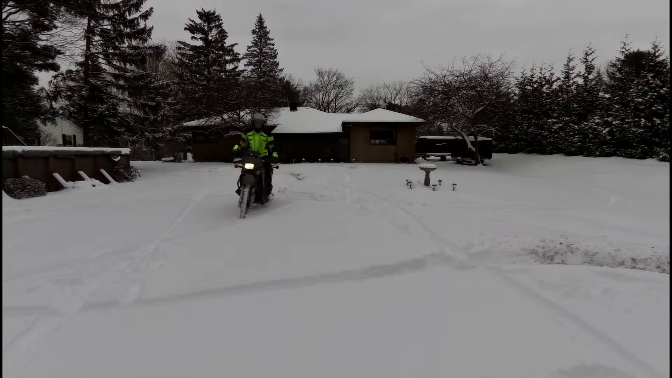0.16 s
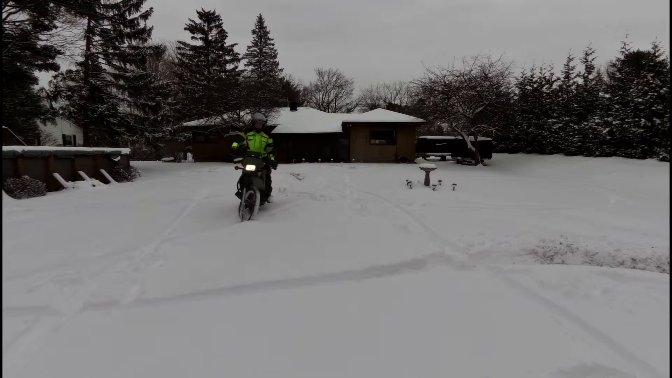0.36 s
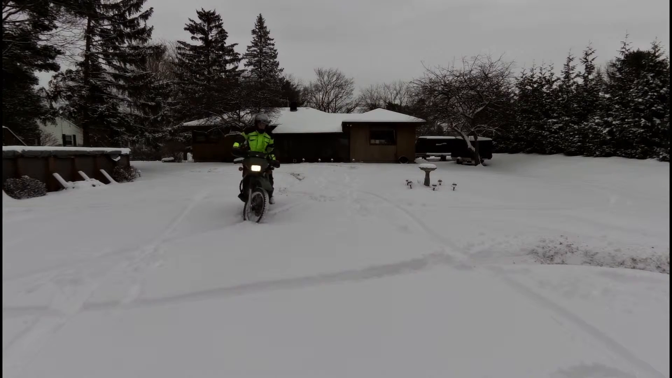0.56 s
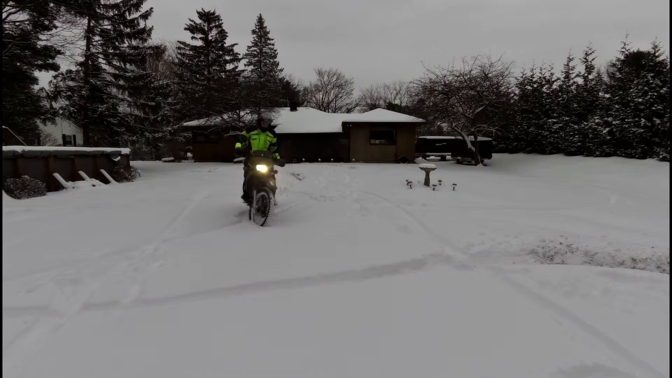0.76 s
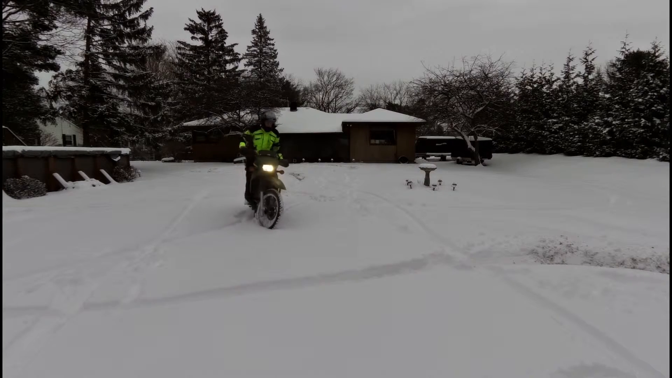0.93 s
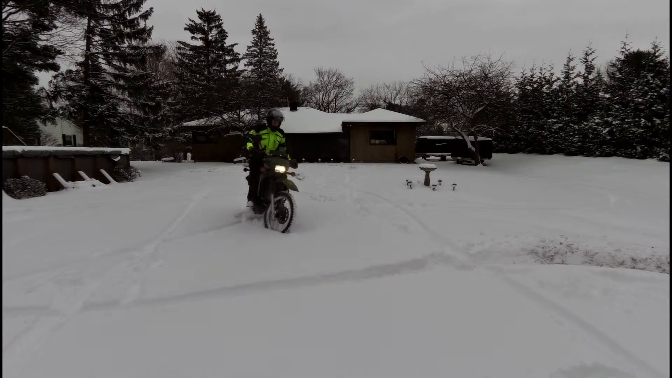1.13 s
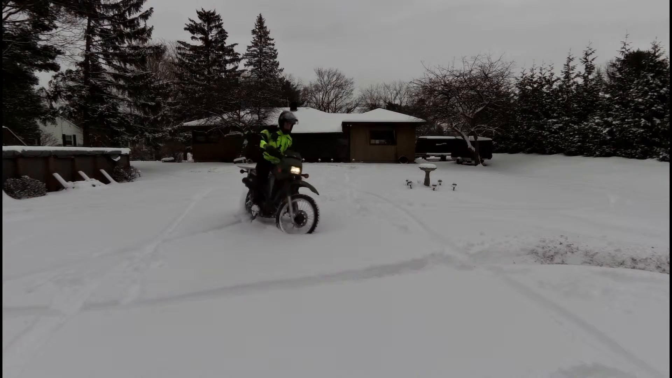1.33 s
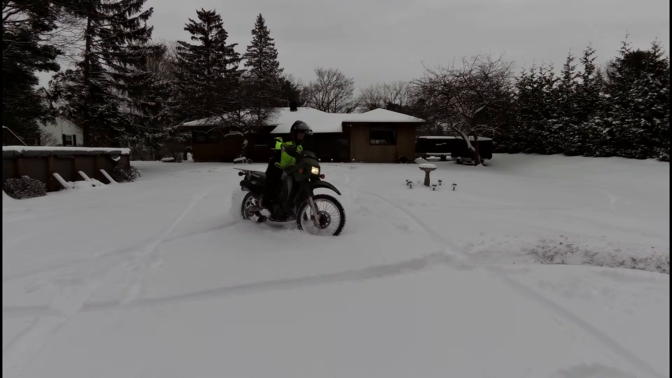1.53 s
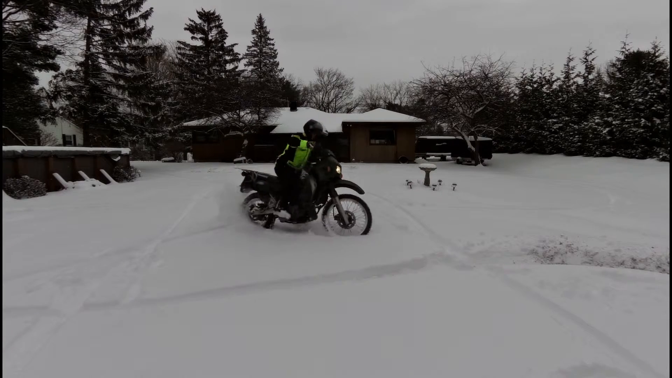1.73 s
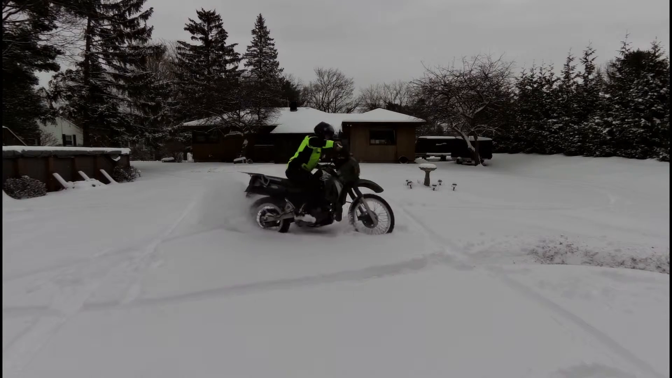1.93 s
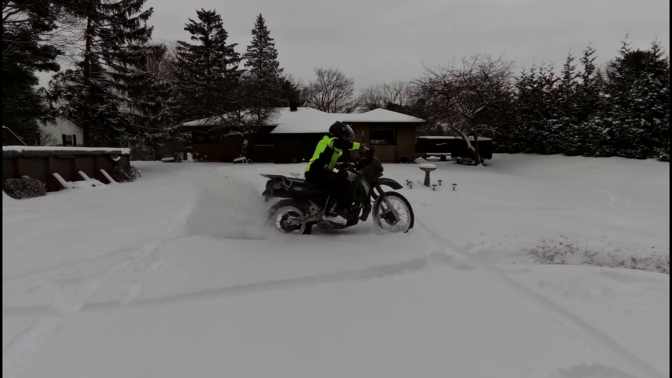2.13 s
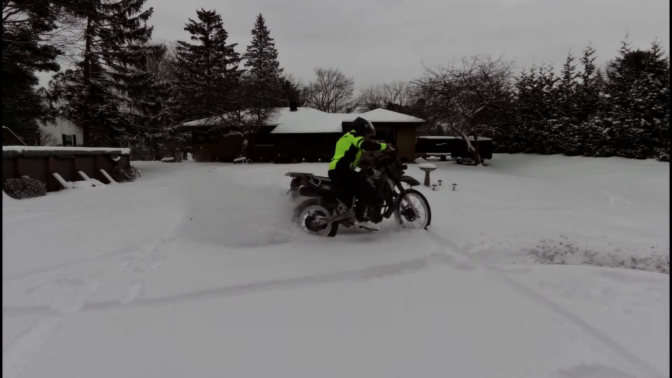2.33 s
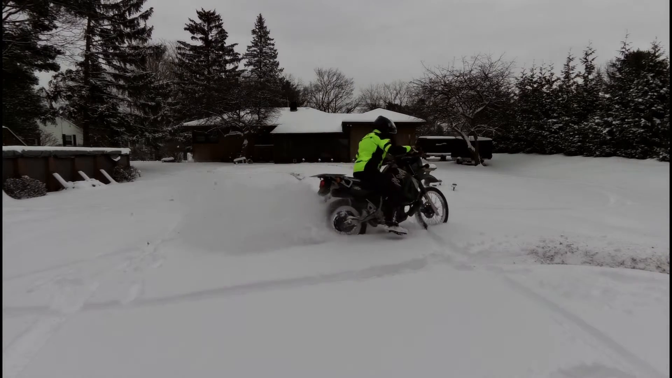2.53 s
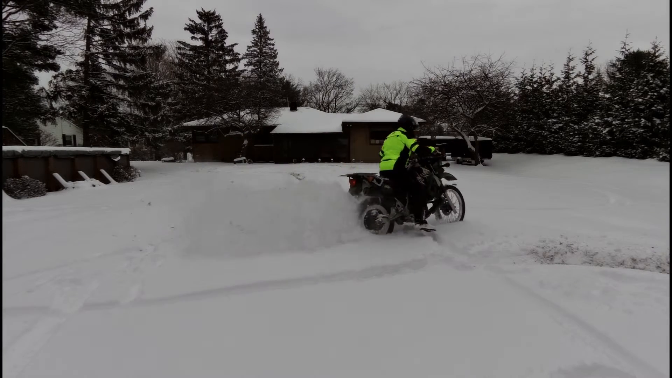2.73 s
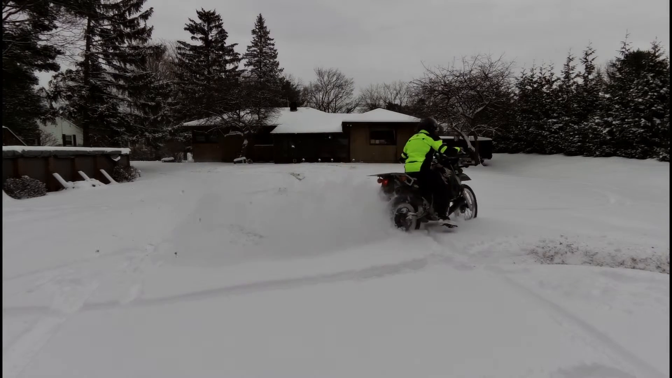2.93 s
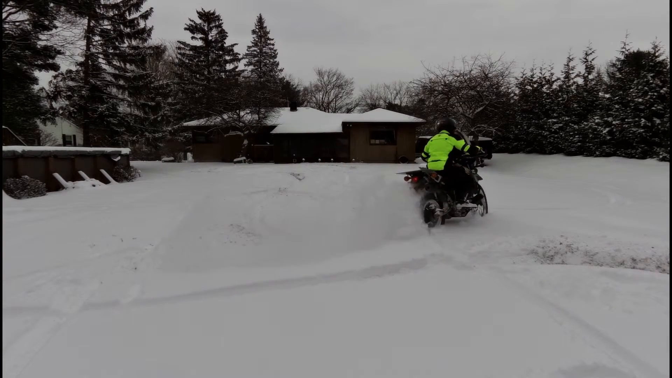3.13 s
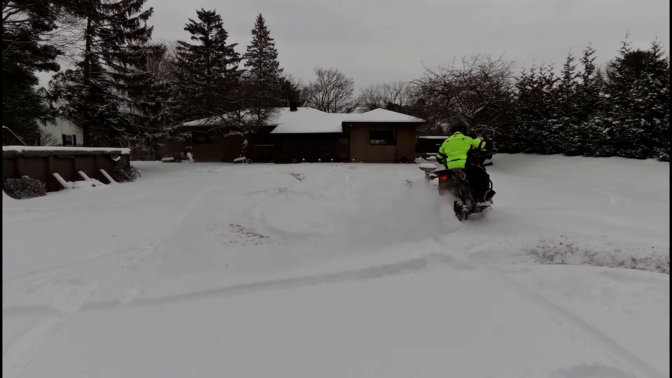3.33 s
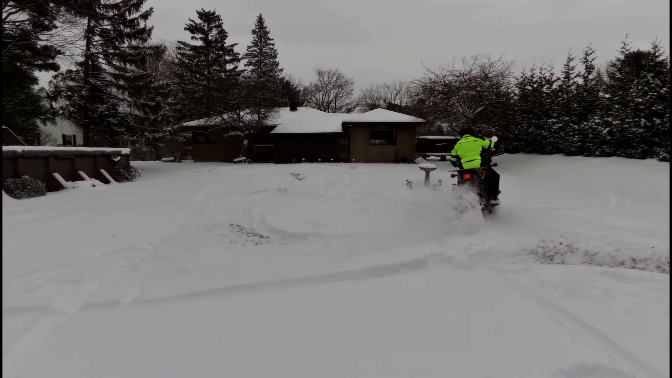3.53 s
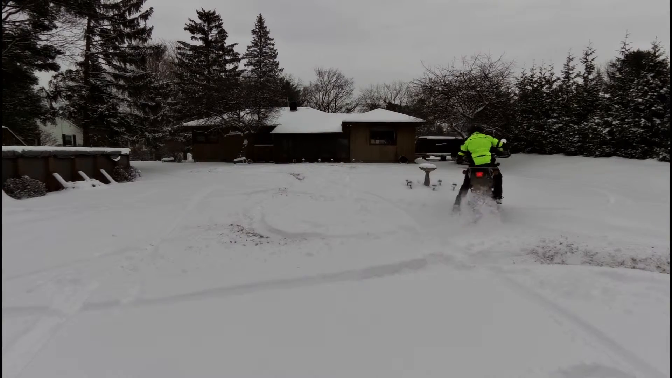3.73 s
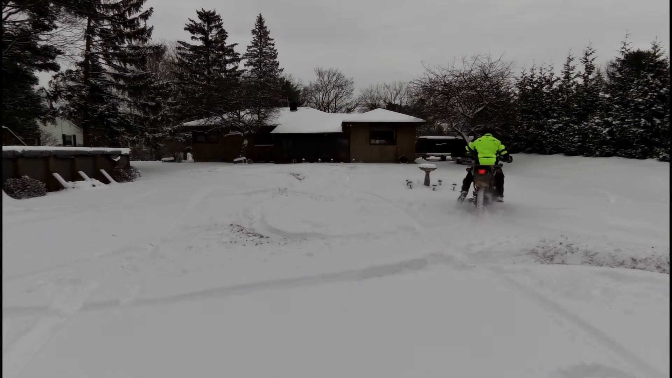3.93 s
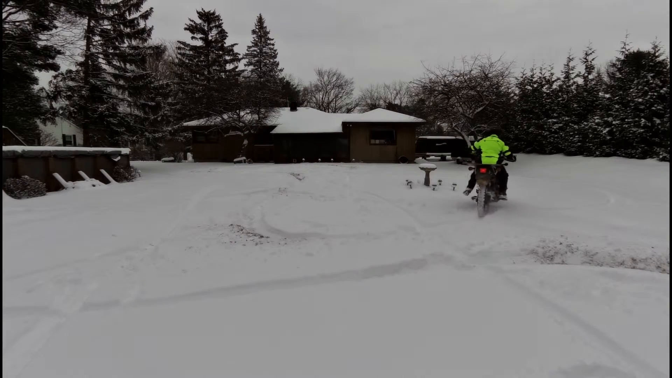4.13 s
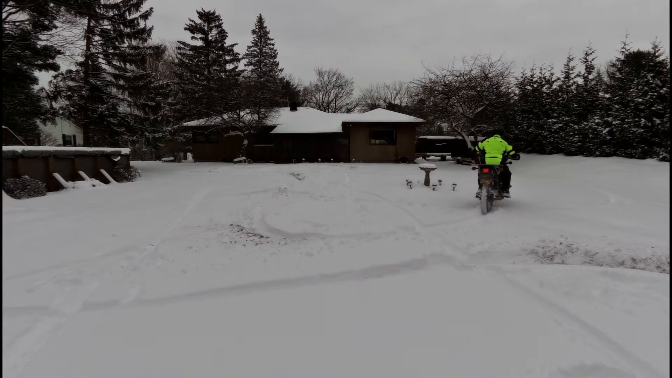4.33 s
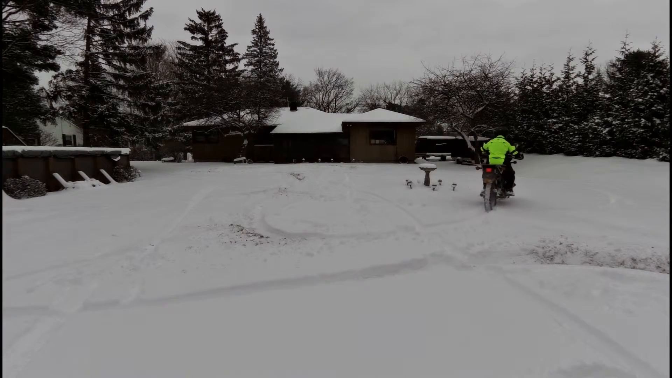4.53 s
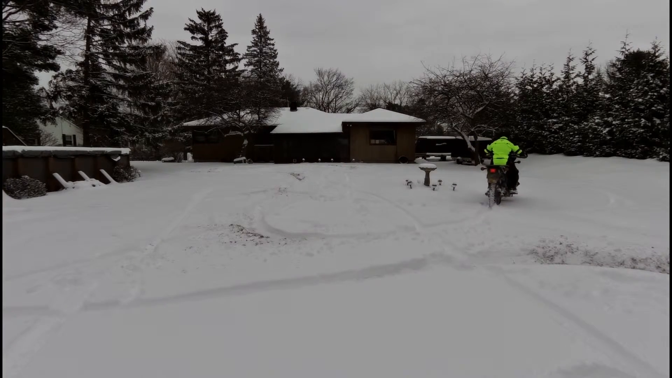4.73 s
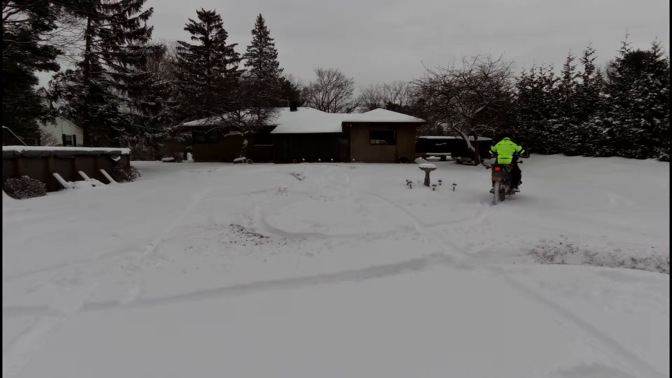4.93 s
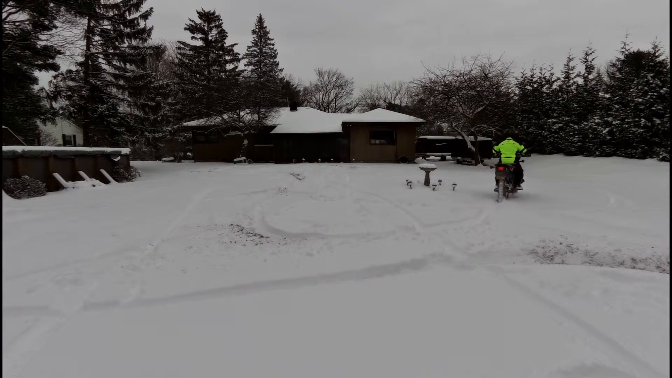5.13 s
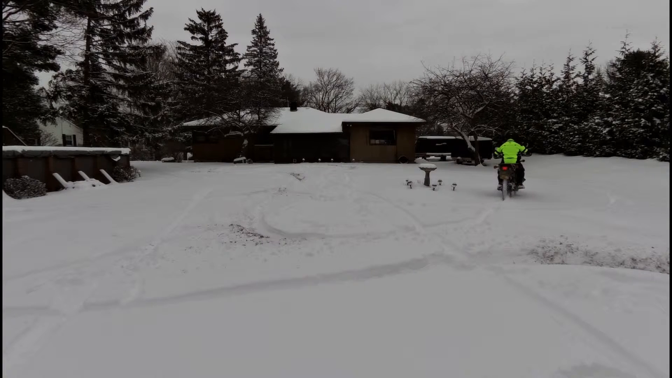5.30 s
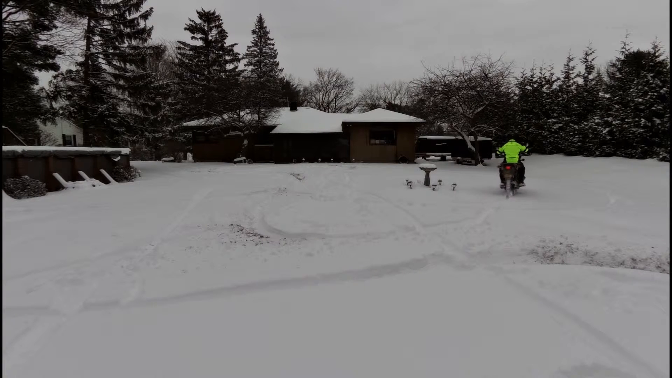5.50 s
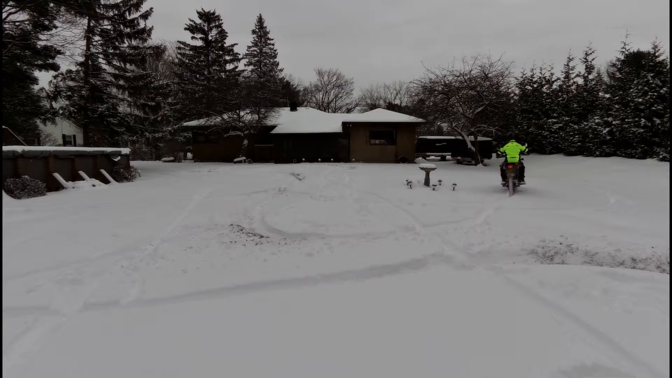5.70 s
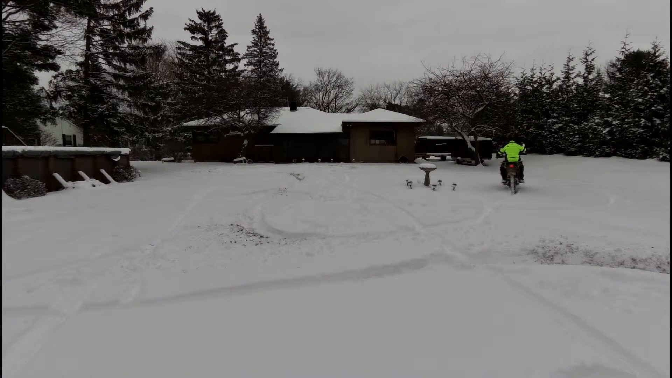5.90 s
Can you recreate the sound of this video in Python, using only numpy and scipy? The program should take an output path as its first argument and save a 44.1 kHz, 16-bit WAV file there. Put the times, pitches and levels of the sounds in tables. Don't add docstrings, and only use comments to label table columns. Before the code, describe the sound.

Outdoors in a snowy yard, a single-cylinder four-stroke motorcycle approaches at a quiet, clattering idle. A throttle blip brings a hollow intake howl, then the engine builds into a fast, coarse, booming roar as it turns close by. The throttle snaps shut with a low thud, revs surge again from behind, then sink to a soft, slow putter. Dry, echo-free, heard by a small fixed microphone over faint air.

```python
import sys
import numpy as np
from scipy import signal
from scipy.fft import rfft, irfft, next_fast_len
from scipy.io import wavfile
from scipy.ndimage import uniform_filter1d

SR = 44100
rng = np.random.default_rng(int(sys.argv[2]) if len(sys.argv) > 2 else 0)


def unload_wav(signal):
    wavfile.write(
        sys.argv[1],
        SR,
        np.round(np.clip(np.atleast_2d(signal).T, -1, 1) * 32767).astype(np.int16),
    )


def magnitude_from_level(level_db):
    exponent = np.asarray(level_db, float) / 20
    return 10 ** exponent


N = 267246


def unit(x):
    return x / np.sqrt(np.mean(x ** 2) + 1e-20)


def near(x, centre, width):
    return np.exp(-((x - centre) / width) ** 2)


def swell(t, tau):
    return t / tau * np.exp(1 - t / tau)


def filtered(x, response):
    m = next_fast_len(N + SR // 2)
    return irfft(rfft(x, m) * response(np.fft.rfftfreq(m, 1 / SR)), m)[:N]


def below(x, hz):
    return filtered(x, lambda f: 1 / (1 + (f / hz) ** 6))


def lifted(x, gain_db, hz, width_hz):
    return x + (magnitude_from_level(gain_db) - 1) * filtered(x, lambda f: near(f, hz, width_hz))


def coloured(x, spectrum, share=lambda f: 1):
    hz, db = np.transpose(spectrum)
    x = unit(filtered(x, lambda f: magnitude_from_level(np.interp(np.log(f + 1), np.log(hz), db))))
    return filtered(x, lambda f: np.sqrt(share(f)))


def noise(spectrum, gate=1, share=lambda f: 1):
    return coloured(gate * rng.standard_normal(N), spectrum, share)


def flutter(db):
    return magnitude_from_level(db * unit(uniform_filter1d(rng.standard_normal(N), size=90)))


def laid(times, shapes):
    index = np.round(times * SR).astype(int)[:, None] + np.arange(shapes.shape[1])
    keep = (index >= 0) & (index < N)
    return np.bincount(index[keep], shapes[keep], N)


def levelled(x, db):
    power = x ** 2
    for _ in range(2):
        power = uniform_filter1d(power, size=SR // 6, mode="reflect")
    return x * magnitude_from_level(db) / np.sqrt(np.abs(power) + 1e-12)


def curves(rows, s):
    at, *cols = np.transpose(rows)
    return [np.interp(s, at, c) for c in cols]


# (time [s], firing rate [firings per s])
CRANK_SPEED = [(0.0, 10.88), (0.469, 10.31), (0.782, 18.09), (0.891, 18.36), (1.159, 15.04), (1.347, 15.34),
               (1.548, 20.31), (2.015, 26.73), (2.443, 26.21), (2.524, 27.1), (3.016, 28.19),
               (3.235, 27.74), (3.447, 19.23), (4.02, 29.24), (4.246, 31.12), (5.019, 15.05),
               (5.614, 10.68), (6.06, 9.97)]


def speed(s):
    flywheel_s = .14
    rate = curves(CRANK_SPEED, np.arange(N) / SR)[0]
    smooth = uniform_filter1d(rate, size=round(flywheel_s * SR), mode="nearest")
    return np.interp(s, np.arange(N) / SR, smooth)


def firings():
    first_cycles = .47
    s = np.arange(N) / SR
    cycles = np.cumsum(speed(s)) / SR - first_cycles
    fire = np.interp(np.arange(int(cycles[-1]) + 1), cycles, s)
    return np.append(fire, 2 * fire[-1] - fire[-2])


# (time [s], heading [degrees])
BIKE_HEADING = [(0, -20), (.4, -20), (.6, 0), (1.35, 10), (1.5, 40), (1.86, 70), (1.88, 75), (2.3, 93),
                (2.55, 102), (2.72, 119), (3.27, 125), (3.35, 170), (3.6, 178), (4.7, 185), (5, 195),
                (6.06, 200)]


def facing(rows, s):
    return curves(rows, curves(BIKE_HEADING, s)[0])


SHARED_HEADINGS = [-20, 5, 40, 75, 95, 120, 170, 180, 198]


def by_bearing(rows, s):
    return facing(np.column_stack([SHARED_HEADINGS, rows]), s)


# (time [s], level [dB])
MOTOR_LOUDNESS = [(0, -48), (.32, -48.5), (.6, -43.5), (.88, -41.5), (1.2, -41.5), (1.42, -39.5),
                  (1.62, -36.5), (1.87, -34), (2.01, -31), (2.15, -32.5), (2.45, -30), (3.21, -30.5),
                  (3.37, -38.5), (3.8, -36), (4.29, -36), (4.7, -39.5), (5.16, -45.5), (6.06, -48)]


def loudness(s):
    return curves(MOTOR_LOUDNESS, s)[0]


# (frequency [Hz], level [dB per Hz])
AIR_COLOUR = [(18, -23.5), (40, -8.5), (150, -10.5), (400, -16), (1500, -36), (3500, -36.5), (5500, -43),
              (8000, -51), (12300, -62.5), (13000, -120)]


def winter_air():
    return magnitude_from_level(-60) * noise(AIR_COLOUR)


# (time [s], peak level [dB], level of what rings above the main tone [dB])
CAMERA_TICKS = [
    (0.0094, -35, -3.5),
    (1.31, -45.5, -6),
]
# (frequency [Hz], level [dB], ring time [ms])
CAMERA_BODY = [(3950, 0, .6), (5800, -6, .3), (3200, -7, .4), (4600, -2, .4)]


def camera():
    s, db, top_db = np.transpose(CAMERA_TICKS)
    t = np.arange(SR // 100) / SR
    main_hz = CAMERA_BODY[0][0]
    tick = 0
    for hz, level, ring_ms in CAMERA_BODY:
        size = magnitude_from_level(level + top_db[:, None] * (hz > main_hz))
        tick = tick + size * np.sin(2 * np.pi * hz * t) * swell(t, ring_ms / 1000)
    return laid(s + 0.000069, magnitude_from_level(db - 2.5)[:, None] * tick)


# (clatter level [dB], roar under 330 Hz [dB],
# share gated by the firing [0-1], side cover's band [dB])
MOTOR_SIDES = [(-20, 5, 0.2, -0.5), (-18.5, 2.5, 0.42, -0.5), (-15.5, 2, 0.59, -2.5), (-17, 3, 0.32, 2.5),
               (-18.5, 3.5, 0.28, 5), (-16.5, -6.5, 0.35, 0), (-15, 7, 0.38, 3), (-18, -3.5, 0.08, 0.5),
               (-16.5, 0.7, 0.36, -0.5)]
# (heading [degrees], gust lead [ms],
# first valve lead [ms], second valve lead [ms], rocker knock between the valves [0-1])
NOISE_LEAD = [(-20, 30, 29, 0, 0), (3, 24, 20.5, -2, .2), (8, 28, 23.5, -3, .1), (10, 28, 23, 0, .1),
              (40, 23, 19, 5, .7), (70, 19, 16.5, 4, .8), (80, 16, 14, 2, .8), (97, 13, 12.5, -.5, .9),
              (105, 12, 10, .3, .3), (125, 12, 10, .8, .5), (170, 18, 12, 5, .6), (178, 17.5, 12, 5.5, .6),
              (181, 15, 12, 5.5, .5), (183, 14.5, 13, 5.5, .4), (185, 18.5, 14, 7, .3),
              (190, 18, 15, 5.5, .2), (200, 20, 17, 4.5, 0)]
# (heading [degrees], snap polarity [+1 or -1], second valve against
# the first [dB], loose tail parts [0-1], roar that repeats every firing [0-1])
FACING_PARTS = [(-20, 1, -12, 0, .15), (0, 1, -9, 0, .3), (20, 1, -10, 0, .2), (48, 1, -2, 0, .2),
                (72, 1, -4, 0, .35), (85, 1, 0, 0, .75), (110, 1, 1, 0, .7), (125, 1, 3, 0, .72),
                (142, 1, 7, 0, .55), (165, -1, 9, 0, .4), (179, -1, 8, 0, .45), (182, -1, 8, 0, .65),
                (185, -1, 5, .2, .35), (195, -1, -1, .7, .2), (200, -1, -2, .7, .15)]
# (frequency [Hz], level [dB per Hz])
WHIRR_COLOUR = [(880, -38.5), (1700, 0.5), (2060, -2), (2400, -4), (2890, -7), (3450, -15), (4200, -19.5),
                (4450, -26.5), (5200, -26.5), (6200, -37), (7600, -48.5), (8300, -46), (10000, -60.5),
                (12400, -68)]
# (frequency [Hz], level [dB per Hz])
HEAD_COLOUR = [(1200, -28.5), (1900, 2.5), (2300, -5.5), (2900, -2), (3400, -20), (3900, -13), (4300, -20),
               (4500, -37), (5300, -25), (6200, -38.5), (8300, -47), (12400, -64.5)]
# (heading [degrees], frequency [Hz], size [ratio])
VALVE_PING = [(-20, 1500, .6), (0, 2000, .7), (10, 2100, .8), (40, 2200, .5), (75, 2100, .35),
              (95, 2300, .25), (110, 2900, .4), (125, 2950, .5), (170, 3700, .3), (175, 2900, .4),
              (179, 2850, .3), (181, 3000, .15), (195, 3300, .2)]
METAL_COVER = [(-20, .1, 0), (10, .15, 0), (40, .5, 0), (75, .6, 0), (100, 1, 0), (125, 1, .1),
               (170, 1, .55), (178, 1, .3), (182, 1, 0)]


def clatter(fire):
    ping_db, ping_ms = 7.5, 1.6
    chain_hz, chain_db = 4080, 1.5
    s, t = np.arange(N) / SR, np.arange(SR // 50) / SR
    clatter_db, _, share, _ = by_bearing(MOTOR_SIDES, s)
    share = np.clip(share, 0, 1)
    first_ms, second_ms, rocker = facing(NOISE_LEAD, fire)[1:]
    _, second_db, loose, _ = facing(FACING_PARTS, fire)

    chance = rng.standard_normal((len(fire), 6))
    uneven = magnitude_from_level(1.4 * chance[:, :4])
    size = uneven * np.transpose([1 + 0 * loose, magnitude_from_level(second_db), 1.3 * loose, .9 * loose])
    lag = np.transpose([-first_ms, -second_ms, 3 + 0 * loose, 15 + 0 * loose]) / 1000
    lag = lag + .0008 * chance[:, [4, 5, 4, 5]]
    tick = np.exp(-.5 * ((t - .01) / .0022) ** 2)
    burst = laid((fire[:, None] + lag - .01).ravel(), size.reshape(-1, 1) * tick)
    between = fire + lag[:, 0] + (lag[:, 1] - lag[:, 0]) * rng.uniform(.2, .8, len(fire))
    burst = burst + laid(between - .01, (rocker * uneven[:, 2])[:, None] * tick)

    rattle = flutter(0.42)
    whirr = (1 - share) * noise(WHIRR_COLOUR, rattle * (1 + .5 * burst))

    ping_hz, ping = facing(VALVE_PING, fire)
    pitches = ping_hz[:, None] * (1 + 0.092 * chance[:, 3::-1])
    ring = np.sin(2 * np.pi * np.outer(pitches, t)) * swell(t, ping_ms / 1000)
    ping_size = magnitude_from_level(ping_db) * ping[:, None] * size
    pings = laid((fire[:, None] + lag - .001).ravel(), ping_size.reshape(-1, 1) * ring)

    chain = np.sin(2 * np.pi * chain_hz * np.outer(1 + 0.032 * chance[:, 2], t)) * swell(t, ping_ms / 1000)
    chain_size = facing(METAL_COVER, fire)[1] * uneven[:, 3]
    pings = pings + laid(fire + 0.018, magnitude_from_level(chain_db) * chain_size[:, None] * chain)

    seat, bright = noise(HEAD_COLOUR, rattle * burst), facing(METAL_COVER, s)[0]
    seat = bright * seat + (1 - bright) * below(seat, 2700)
    return levelled(pings + whirr + 1.84 * share * seat, loudness(s) + clatter_db + 0.5)


# (frequency [Hz], level [dB per Hz])
ROAR_COLOUR = [(120, -39), (190, -14), (250, -11.5), (310, -6), (390, -1), (493, -5), (646, -4), (800, -6),
               (1060, -7.5), (1150, -11.5), (1390, -12), (1900, -23), (2500, -38), (5500, -120)]
# (heading [degrees], rise time [ms], fall time [ms])
GAS_GUST = [(-21.5, 4, 4.9), (7, 2.2, 15), (33, 0.83, 14), (59.5, 1.1, 6.8), (80, 3, 7.8),
            (125.5, 3.8, 5.1), (182.5, 3, 7.7), (201, 2.5, 17)]
# (heading [degrees], lead [ms])
SNAP_LEAD = [(-20, 19), (3, 18.5), (8, 25.5), (10, 24), (30, 10.7), (40, 10.4), (67, 10.3), (78, 9.5),
             (81, 10.3), (95, 10), (105, 10.3), (121, 10.1), (125, 10.3), (148, 11.5), (170, 15.4),
             (177.7, 15.3), (178.8, 14.1), (180, 13.6), (180.7, 12.9), (181.1, 12.3), (181.6, 12.7),
             (182, 12.6), (182.6, 11.6), (183, 12.6), (183.5, 14.2), (184.3, 16), (185.5, 15.4),
             (190, 14.9), (200, 15.8)]
# (heading [degrees], honk frequency [Hz], second puff's delay [ms],
# push ahead of the boom [0-1])
PIPE_EXIT = [(-20, 364, 10.7, 0), (3, 380, 6, 0), (8, 380, 12.5, 0), (40, 400, 10.7, 0), (95, 380, 10.5, 0),
             (105, 364, 10.7, 0), (125, 364, 10.7, 0), (172, 368, 11, 0), (174, 368, 11, .3),
             (179, 374, 9.5, .3), (181, 374, 8.9, .3), (186, 370, 9, .6), (200, 364, 9.1, .45)]
# (heading [degrees], snap thrown back by the engine case [0-1], roar level [dB])
CASE_REFLECTION = [(40, 0, 0), (75, .45, -1), (100, .5, -1.5), (120, .15, -.5), (170, 0, 0), (180, .2, -.5),
                   (184, .2, -.5), (190, 0, 0)]
# (frequency [Hz], width [Hz])
PANEL_BANDS = [(380, 70), (640, 70), (800, 70), (1350, 110)]
# (first [dB], second [dB], third [dB], fourth panel [dB])
PANEL_GAINS = [(-1, 0.56, 2.5, -1), (0, 0.14, -3.5, -2.5), (4.5, 1, 1, -3), (-8, 0.44, 1, 0),
               (-2, 0.51, -8, 3), (0, 1.5, -4, 1), (-4, 0.72, 2, 0), (-1, 1.4, 1.5, 0), (-2, 0, 1, 1.5)]


def roar(fire):
    s, t = np.arange(N) / SR, np.arange(SR // 10) / SR
    _, growl_db, share, cover_db = by_bearing(MOTOR_SIDES, s)
    share, repeat = np.clip(share, 0, 1), facing(FACING_PARTS, s)[3]
    snap_ms, gust_ms = facing(SNAP_LEAD, fire)[0], facing(NOISE_LEAD, fire)[0]

    rise, fall = np.array(facing(GAS_GUST, fire))[..., None].clip(.3) / 1000
    strength = magnitude_from_level(2 * rng.standard_normal((len(fire), 1)))
    gust = laid(fire - gust_ms / 1000, strength * 2 * (1 - np.exp(-t / rise)) * np.exp(-t / fall))
    gate = flutter(2) * (1 - share + share * gust)

    strokes = signal.lfilter([1], [1, -.9], rng.standard_normal((len(fire), len(t))), axis=0)
    low = lambda f: 1 / (1 + (f / 1700) ** 3)
    deep = lambda f: 1 / (1 + (f / 500) ** 8)
    back = (t - facing(PIPE_EXIT, fire)[1][:, None] / 1000 + .004).clip(0)
    puffs = .8 * swell(t, .002) + .7 * swell(back, .004) + .5 * swell(t, .013)
    same = coloured(laid(fire - snap_ms / 1000 - .0005, strokes * puffs), ROAR_COLOUR, low)
    same = same * np.sqrt(25 / speed(s))

    fresh_low = noise(ROAR_COLOUR, gate, lambda f: low(f) * (1 - .5 * deep(f)))
    fresh = np.sqrt(1 - repeat) * fresh_low + noise(ROAR_COLOUR, gate, lambda f: 1 - low(f))
    gas_db = loudness(s) + facing(CASE_REFLECTION, s)[1] - 0.5
    gas = levelled(np.sqrt(repeat) * same + fresh, gas_db)

    gas = lifted(gas, cover_db, 1020, 130)
    for (hz, width_hz), db in zip(PANEL_BANDS, by_bearing(PANEL_GAINS, s)):
        gas = lifted(gas, db, hz, width_hz)
    howl_db = 7.5 * near(s, 0.85, 0.33)
    gas = lifted(gas, howl_db, 840, 120)
    return gas + (magnitude_from_level(growl_db) - 1) * below(gas, 330)


# (boom level [dB], chamber level [dB], honk level [dB])
OUTLET_SIDES = [(0, -9, -21), (-5, -8.5, -15), (-4, -20, -8), (-6, -17.5, -29), (-3.5, -17, -18.5),
                (-4, -21, -10.5), (5.5, -14, -20), (-1, -19.5, -21.5), (1.6, -9.5, -25)]
# (heading [degrees], level [dB])
SNAP_LEVEL = [(-20, -16.5), (5, -18), (40, -12.5), (75, -6.5), (95, -4.5), (120, -9), (170, -12),
              (181, -10), (185, -11), (198, -12.5)]


def outlet_levels():
    s = np.arange(N) / SR
    sides = by_bearing(OUTLET_SIDES, s) + facing(SNAP_LEVEL, s)
    boom_db, chamber_db, honk_db, snap_db = np.array(sides) + loudness(s)
    faster = speed(s) - 20
    drone_db = 12 * near(speed(s), 30.2, 2.5)
    thud_db = 9 * near(s, 3.35, .04)
    boom_db = boom_db - thud_db / 4 + 0.03 * faster
    chamber_db = chamber_db + drone_db + thud_db
    return boom_db, chamber_db, snap_db + 0.2268 * faster, honk_db + 1.16 * faster


# (heading [degrees],
# offset from its pitch [Hz], ring time [ms], lead [cycles of the boom])
PIPE_BOOM = [(-20, -12, 5.8, .9), (0, 0, 5.3, .83), (10, 6, 4.8, .85), (45, -8, 4.4, .73), (70, 4, 6, .73),
             (75, 4, 9, 1.75), (90, 2, 11, 1.9), (125, 7, 11.4, 1.91), (147, -24, 6.5, 1.5),
             (170, -15, 5.5, 1.5), (171.5, 0, 6, 1.41), (173, 0, 7.7, 1.41), (178, -1, 6.3, 1.45),
             (182, 0, 8, 1.53), (186, 0, 6.3, 1.44), (195, 0, 6.1, 1.41), (199, 2, 7.5, 1.47)]
# (firing rate [firings per s], frequency [Hz])
HOT_PIPE_PITCH = [(17, 104.5), (20, 108.5), (31, 140)]
# (heading [degrees], frequency [Hz], lead [ms])
SILENCER_CHAMBER = [(-20, 53, -5.4), (0, 63, -2.5), (20, 70, -3.5), (57, 70, 2.5), (90, 58.5, 6.1),
                    (125, 58, 7.5), (180.5, 59, 12), (182, 65, 10.4), (188, 65, 10.2), (195, 67, 1.2)]
# (heading [degrees], delay [ms], first return [0-1], second return [0-1])
PIPE_RETURN = [(-20, 16, .15, 0), (3, 16, .4, .25), (10, 15.8, .5, .35), (40, 23.5, .6, 0),
               (68, 23, .65, 0), (75, 23, 0, 0)]


def exhaust(fire):
    t = np.arange(SR // 8) / SR
    off_hz, ring_ms, lead_cycles = facing(PIPE_BOOM, fire)
    hz = curves(HOT_PIPE_PITCH, speed(fire))[0] + off_hz
    low_hz, low_lead_ms = facing(SILENCER_CHAMBER, fire)
    size = magnitude_from_level(0.36 * rng.standard_normal((len(fire), 2)))
    boom_db, chamber_db = outlet_levels()[:2]

    after = t - .5 / hz[:, None]
    push = facing(PIPE_EXIT, fire)[2][:, None] * near(after, -.001, .003)
    envelope = swell(after.clip(0), ring_ms[:, None] / 1000) + push
    pulse = -size[:, :1] * np.sin(2 * np.pi * hz[:, None] * after) * envelope
    chamber = -size[:, 1:] * np.sin(2 * np.pi * low_hz[:, None] * t) * swell(t, .01)

    delay_ms, *returns = facing(PIPE_RETURN, fire)
    start = fire - (lead_cycles + .5) / hz
    boom = laid(start, pulse)
    for trip, share in enumerate(returns, 1):
        boom = boom + laid(start + trip * delay_ms / 1000, share[:, None] * pulse)
    both = levelled(boom, boom_db) + levelled(laid(fire - low_lead_ms / 1000, chamber), chamber_db)
    return below(both, 195)


# (heading [degrees], level [dB])
FIRST_PUFF = [(-20, -6), (10, -3), (40, 10), (80, 9), (97, 3), (110, -2), (122, -6), (125, -3), (170, 7),
              (180, 4), (182, 7), (184, 4), (186, 8)]


def mouth(fire):
    case_ms = 8.4
    t = np.arange(SR // 20) / SR
    chance = rng.standard_normal((len(fire), 5))
    polarity = facing(FACING_PARTS, fire)[0]
    honk_hz, delay_ms, _ = facing(PIPE_EXIT, fire)
    snap_db, honk_db = outlet_levels()[2:]
    start = fire - facing(SNAP_LEAD, fire)[0] / 1000 + .0001 * chance[:, 0]
    back = start + delay_ms / 1000 + .0001 * chance[:, 1]

    front = np.sin(2 * np.pi * 620 * np.outer(1 + .04 * chance[:, 4], t)) * swell(t, .00055)
    first = polarity[:, None] * magnitude_from_level(0.55 * chance[:, 2:3]) * front
    thrown_back = facing(CASE_REFLECTION, fire)[0][:, None] * first
    snap = laid(start, first) + laid(start + case_ms / 1000, thrown_back)

    honk = np.sin(2 * np.pi * np.outer(honk_hz, t)) * (swell(t, .0019) + .1 * swell(t, .006))
    second = magnitude_from_level(chance[:, 3:4]) * (honk + 0.11 * front)
    ring = start + .00045 * (1 - polarity)
    first_honk = magnitude_from_level(facing(FIRST_PUFF, fire)[0][:, None] + chance[:, 2:3]) * honk
    honks = laid(back, second) + laid(ring, first_honk)

    both = levelled(snap, snap_db) + levelled(honks, honk_db)
    return filtered(both, lambda f: 1 / (1 + (290 / (f + 1)) ** 6) / (1 + (f / 1500) ** 3))


def scene():
    fire = firings()
    bike = clatter(fire) + roar(fire) + exhaust(fire) + mouth(fire)
    return (winter_air() + camera() + bike)[None]


def top_cut(x):
    return signal.sosfilt(signal.butter(12, 12380, fs=SR, output="sos"), x)


def record(dry):
    mix = filtered(dry[0], lambda f: 1 / (1 + (30 / (f + 1)) ** 4))
    return top_cut(mix[None])


dry = scene()
out = record(dry)
unload_wav(out)
```